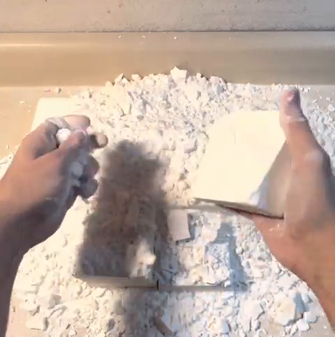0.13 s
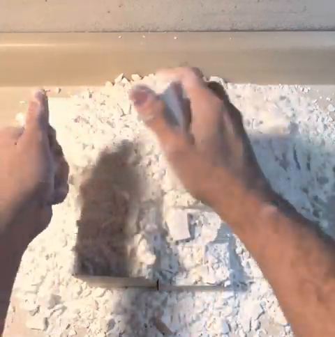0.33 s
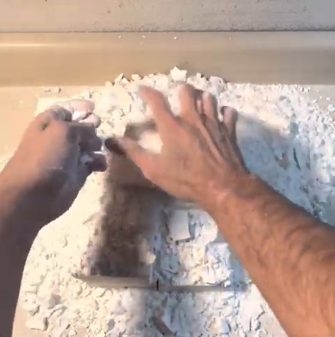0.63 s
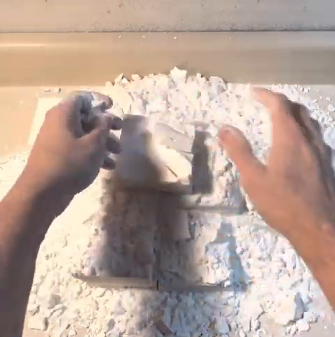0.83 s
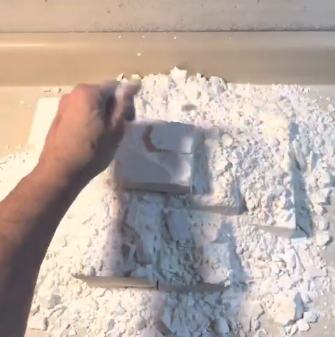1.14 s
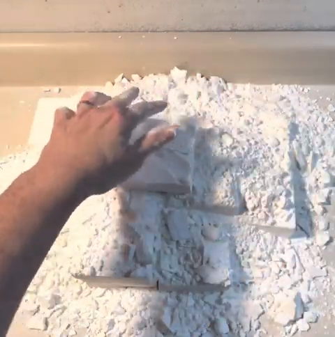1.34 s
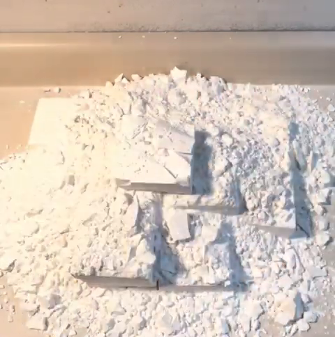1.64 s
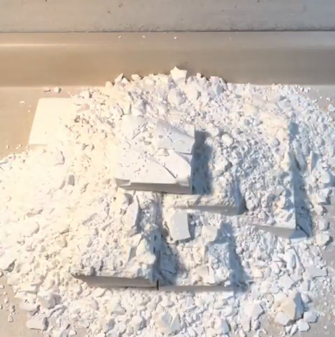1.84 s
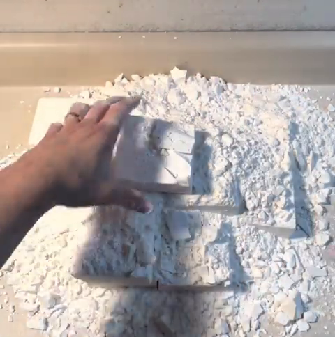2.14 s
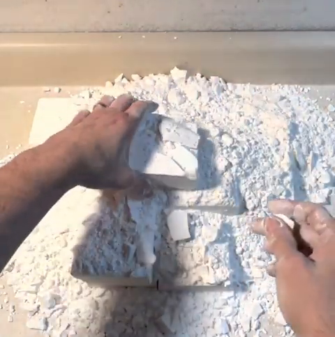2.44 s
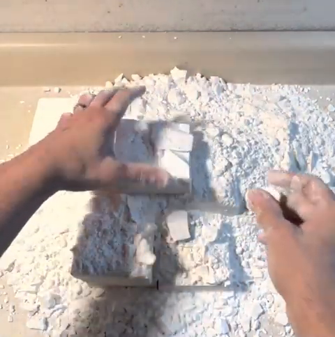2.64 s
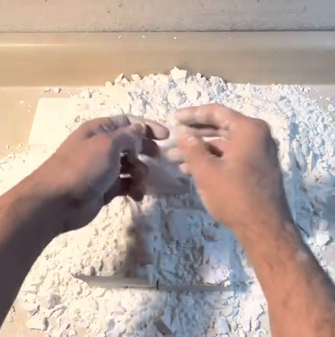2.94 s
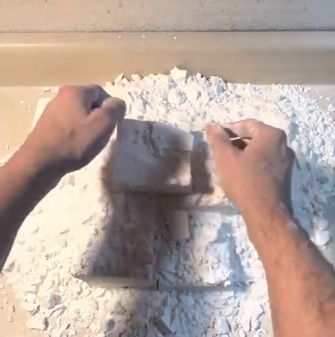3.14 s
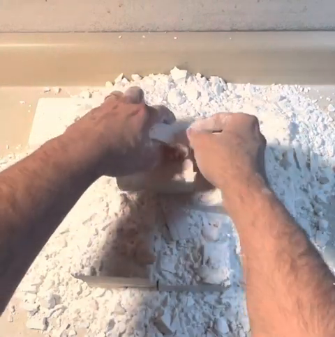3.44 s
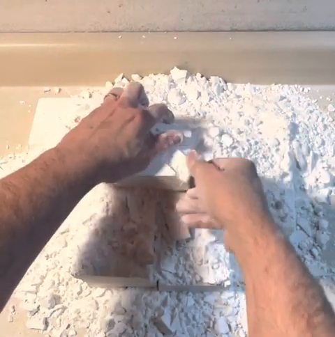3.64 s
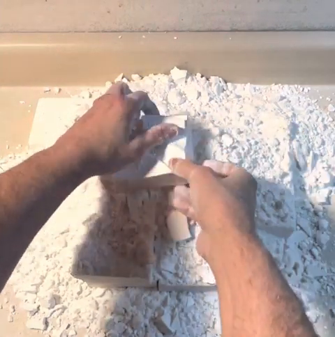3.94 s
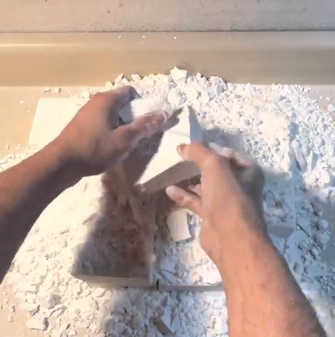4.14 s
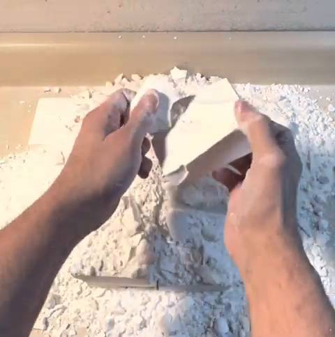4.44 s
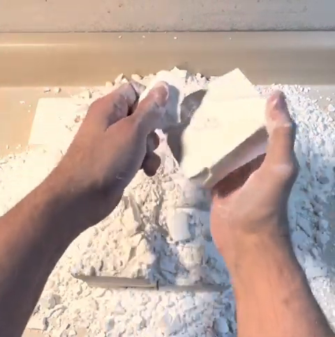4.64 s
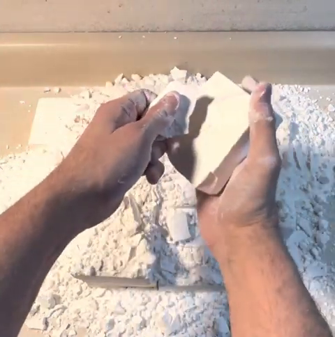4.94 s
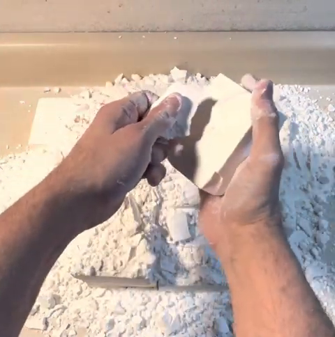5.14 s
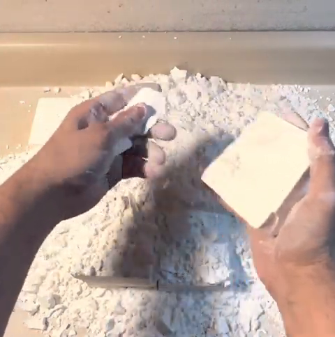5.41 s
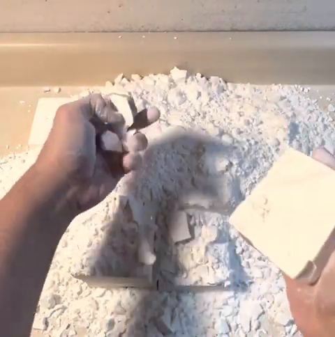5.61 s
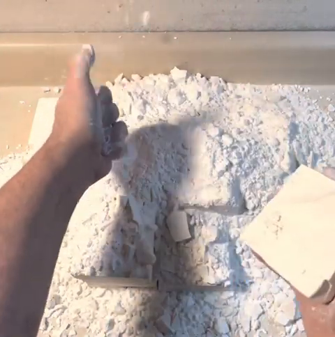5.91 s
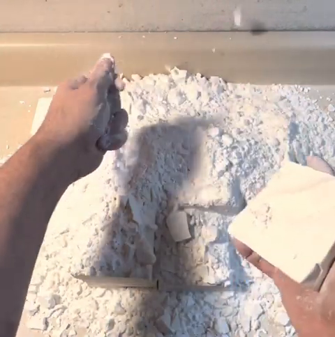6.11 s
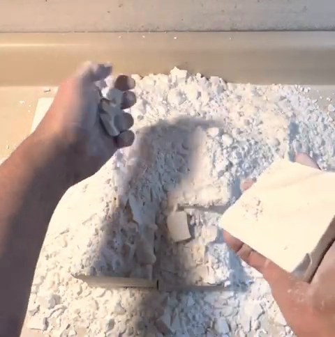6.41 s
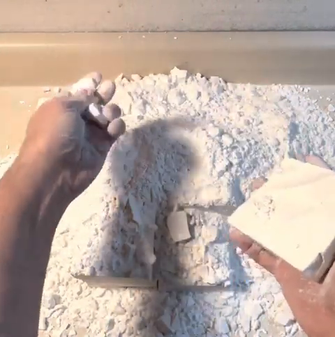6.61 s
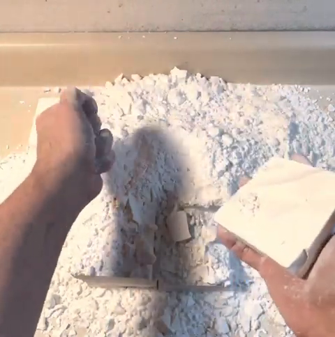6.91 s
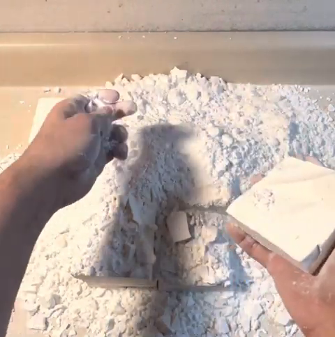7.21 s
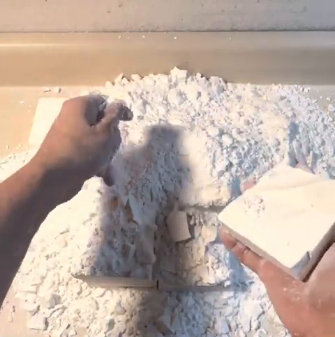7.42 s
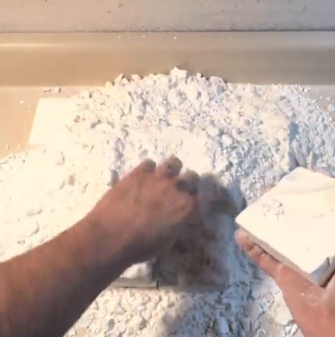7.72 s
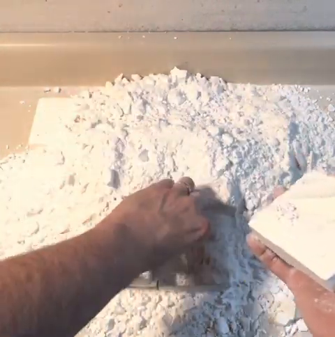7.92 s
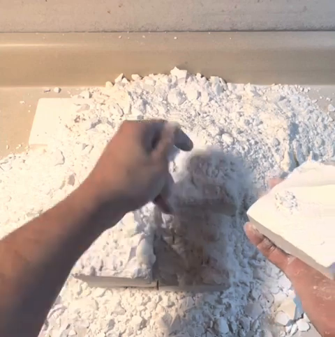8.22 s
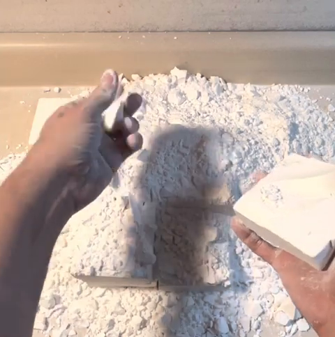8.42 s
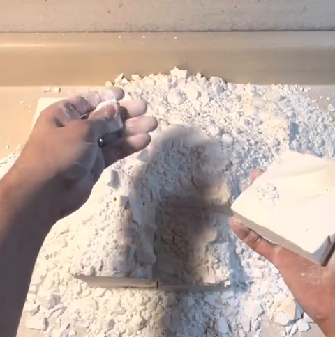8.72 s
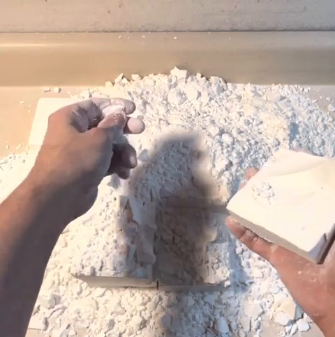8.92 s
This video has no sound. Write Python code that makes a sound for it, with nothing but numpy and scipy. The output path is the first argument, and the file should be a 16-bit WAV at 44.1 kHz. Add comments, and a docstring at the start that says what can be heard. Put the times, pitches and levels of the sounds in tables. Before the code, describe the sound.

In a small room, close stereo microphones hear chalk broken by hand over a constant low machine rumble with a faint motor tone. From 0.2 s, dry ticks and powdery rubbing thicken into crunching; at 0.65 s a heavy boomy thud rings the counter, and brittle cracks crowd in until 1.3 s, ending with a short squeak. Sparse crumbling follows, with a crumbly tap at 1.83 s and an abrupt, brief dip in level. Soft low thumps come at 2.3-2.6 s and 3.4-3.7 s, then gritty rubbing, a small crack at 4.1 s and thin squeaks at 4.5-4.9 s. Sharp snapping starts at 5.25 s and becomes loudest at 5.55-5.9 s, clipping hard. Scattered crackles fade, another strong snap lands at 6.8 s, and light rubbing and soft pushes continue through 8 s. A dull scrape precedes crisp cracks from 8.8 s to the end, about 9 s.

```python
"""Breaking and rubbing chalk

Hands snap, rub and crush soft chalk blocks on a counter, heard by two close microphones.
Cracks are dying noise bursts through short resonances; fingers hiss and crumbs crunch as grainy coloured noise.
Pushes ring the counter's low mode; thuds and a few low taps and ticks are noise blows through low resonances.
A machine hums as low noise and steady tones; the level dips once, briefly, and the loudest peaks clip."""
import sys
import numpy as np
from scipy import signal
from scipy.fft import rfft, irfft, next_fast_len
from scipy.io import wavfile
from scipy.ndimage import uniform_filter1d, map_coordinates

SR = 44100
rng = np.random.default_rng(int(sys.argv[2]) if len(sys.argv) > 2 else 0)


def ratio_of_db(decibels):
    """Turn decibels (scalar or array-like) into linear amplitude factors; 0 dB maps to 1."""
    return 10 ** (np.asarray(decibels, float) / 20)


def to_wav(s):
    """Save 16-bit WAV."""
    ch = np.atleast_2d(s).T  # columns
    pcm = np.round(np.clip(ch, -1, 1) * 32767)  # PCM
    wavfile.write(sys.argv[1], SR, pcm.astype(np.int16))


N = 399546  # samples in the scene

# clear fractures and knocks: start_s, peak_db, ring_hz (strongest ring),
# knock_db (re peak), treble_db (re peak)
FRACTURES = [(0.179, -16, 2720, -21, -8), (0.2105, -22, 2860, -17, -26), (0.2825, -11, 5850, -19, -1),
             (0.2907, -3, 2000, -16, -19), (0.3453, -9.5, 2540, -20, -14), (0.3905, -9, 2060, -12, -12),
             (0.4023, -16, 5000, -21, -22), (0.4403, -4.5, 1950, -34, -11), (0.5015, -15, 1930, -21, -16),
             (0.5236, -8.5, 2010, -27, -41), (0.5641, -21, 1970, -20, -9), (0.633, -10, 2000, -14, -39),
             (0.6512, -3.5, 1450, -19, -29), (0.6546, -2, 3000, 0, -35), (0.6834, -25, 1280, -8, -20),
             (0.7391, 6.5, 5620, -12, -15.5), (0.7973, -5, 5940, -7, -15), (0.8131, -3.5, 1910, -10.5, -9),
             (0.8504, -22, 2990, -9, -6), (0.953, -2.5, 5200, -13, -17), (0.9594, -8, 1980, -22, -1),
             (1.0146, -7, 6300, -10.5, -9), (1.059, -19, 5770, -12, -19), (1.076, -15, 2790, -25, -10),
             (1.09, -24, 3450, -13, -25), (1.1416, -21.5, 1310, -13, -9), (1.2234, -13.5, 5260, -23, -3),
             (1.261, -15, 5440, -25, -9), (1.274, -5, 5510, -23, -7), (1.2981, -15, 1880, -6, -36),
             (1.4865, -5, 2090, -28, -52), (1.6007, -16.5, 7100, -30, -23), (1.9804, -25, 2780, -2, -21),
             (2.2904, -18.5, 2760, 0, -40), (2.5406, -31, 1900, -6, -41.5), (2.5543, -16.5, 3010, 2.5, -50),
             (2.603, -22.5, 3020, 3, -2.5), (3.463, -13, 1830, 1, -23), (3.5355, -27, 1955, 8, -11),
             (3.696, -21.5, 3020, 7, -21), (3.7638, -22, 4100, -3.5, -29), (3.7974, -19, 3070, -22, -40),
             (3.88, -28.5, 4092, -12, 3), (3.9253, -28.5, 1330, 6, -17), (4.1262, -9, 2600, -27, 0),
             (4.1946, -22, 6000, -12, -15), (4.227, -24, 2920, -30, -3), (4.398, -30, 4090, -2, -13),
             (5.2449, -9.5, 6000, -29, -24), (5.2928, -6, 4450, -25, -3.5), (5.3143, 1, 5400, -21, -14),
             (5.3639, 3.5, 2410, -24, -6), (5.5706, 8, 5330, -22, -6), (5.5824, -2.5, 2830, -17, -12),
             (5.6096, -8.5, 7300, -17, -49), (5.6527, 11.5, 2590, -24, -8.5),
             (5.7134, -0.5, 2460, -12.5, -34), (5.7342, -14, 2400, -15, 7.5), (5.7491, 4.5, 2300, -24, -14),
             (5.7554, -7, 2720, -27, -14), (5.7707, -14, 2700, -24, -22), (5.7867, 13.5, 2830, -40, -16),
             (5.817, -2, 2790, -22, -15), (5.8252, -0.5, 2580, -32, -10), (5.8394, -6.5, 2580, -23, -9.5),
             (5.876, 5, 2980, -11, -8.5), (5.9297, -19, 7440, -23, -27), (5.935, -18, 2580, -15, -27),
             (5.9542, -17, 2830, 1, -29), (6.0339, -3.5, 4700, -19, -19), (6.11, -11, 2130, 2.5, -9),
             (6.1353, -15.5, 5990, -12, -19), (6.2028, -8, 1480, -14, -12), (6.2102, -11, 2460, -2, -17),
             (6.2572, -13.5, 2470, -25, -6), (6.348, -26, 2530, -29, -24), (6.4872, -19.5, 2350, -11, -17),
             (6.757, -8.5, 5590, -24, -10), (6.7779, -12, 8500, -20, 8.5), (6.7858, -3, 7000, -25, -7),
             (6.7928, -14.5, 2720, -23.5, -15), (6.8059, -14.5, 2530, -21, -16),
             (6.8273, 6.5, 2350, -22, -5.5), (6.8597, -13, 2560, -20, 1), (6.8795, -13.5, 1700, -1.5, -15),
             (6.9225, -15, 2430, -30, -37), (7.0236, -11.5, 1400, -11, -22),
             (7.0824, -19, 5920, -19.5, -23), (7.224, -37, 2500, -8, -20), (7.2443, -16, 5420, -21, -19),
             (7.2652, -17, 2310, -16, 0), (7.3168, -17, 2800, -32, -27), (7.356, -22, 2750, -26, -16),
             (7.421, -18, 2030, -17, -25), (7.6019, -13.5, 1300, -25, -17), (7.6836, -19, 3966, -5, -24),
             (7.755, -29, 1360, -9, -16), (7.7622, -21.5, 4060, -19, -3), (7.9454, -15, 1960, -22, -26),
             (8.2507, -23.5, 1611, -1.5, -5), (8.7826, 5, 2540, -18, -13), (8.8034, -7, 2430, -25, -22),
             (8.8259, 2, 2460, -17, -15), (8.837, -8, 3390, -18, -10), (8.8684, -17, 2540, -26, -13),
             (8.9029, -9.5, 5000, -29, -11), (8.9339, -1.5, 2420, -36, -5.5),
             (8.955, -12.5, 7800, -26, -24), (8.972, -25, 2850, -16, -12), (8.9917, -15, 4970, -28, -3),
             (9.0544, -4.5, 2920, -25, -12)]
# resonances of a whole chalk block: pitch_hz, width_hz, level_db (per pass through the block)
BLOCK_MODES = [(910, 120, -14), (1900, 190, -1), (2580, 39, 4), (3000, 90, 1), (3780, 43, 4.5),
               (4150, 90, 4.5), (4640, 61, 5), (5450, 190, 5), (5750, 140, 4), (6280, 150, 5.5),
               (7840, 1500, 1.5)]
# colour of the snap: freq_hz, level_db (relative)
SNAP_COLOUR = [(710, -17), (1200, -14.5), (2020, -15), (2590, -3), (3220, -14.5), (4960, -5.5),
               (6960, -4.5), (9500, -7), (12400, -47), (20900, -120)]
# colour of the dull knock: freq_hz, level_db (relative)
KNOCK_COLOUR = [(180, -35), (300, 1), (592, -11), (1030, -8.5), (1410, -17.5), (1600, -12.5), (2080, -15.5),
                (3520, -120)]
# colour of the finest treble, for cracks and rubbing: freq_hz, level_db (relative)
SHEEN_COLOUR = [(5000, -33), (8500, -11), (9270, -12), (10000, -15.5), (13200, -11), (15100, -16),
                (16300, -58)]
BASE_T60_S, T60_SCATTER = 0.017, 0.39  # ring-down of a fracture before stretching, log spread
HEAVY_DB = 31.5  # a heavier knock crumbles longer: ten times the ring-down per this much more knock


def cracks():
    """Each fracture is a dying burst with its own ring, a dull knock and a treble spit; some tap the block."""
    out, taps = np.zeros((2, N + SR)), np.zeros((2, N + SR))
    pulses = causal(SNAP_COLOUR), causal(KNOCK_COLOUR), causal(SHEEN_COLOUR)
    size = SR // 20
    powder_gain = pressure()[0]
    for start_s, peak_db, ring_hz, knock_db, treble_db in [*FRACTURES, *ticks(powder_gain)]:
        stretch = 10 ** (np.clip(knock_db + 12, 0, 14) / HEAVY_DB)
        t60 = BASE_T60_S * stretch * np.exp(T60_SCATTER * rng.standard_normal())
        at = round(start_s * SR)
        crack = fracture(ring_hz, knock_db, treble_db, t60, size, pulses)
        out[:, at:at + size] += ratio_of_db(peak_db) * crack
        if .6 < start_s < 4.3:  # only between these times do cracks also tap the block
            taps[:, at:at + size] += ratio_of_db(peak_db + .4 * knock_db + 3) * burst(.3 * t60, size)
    block = filtered(taps[:, :N], modes(BLOCK_MODES))
    return spread(out[:, :N] + ratio_of_db(-12) * block)


def fracture(ring_hz, knock_db, treble_db, t60, size, pulses):
    """One break: a sharp step and noise ring the loose piece, with a longer knock and a treble spit."""
    snap, knock, sheen = pulses
    split = burst(0.91 * t60, size)
    split[:, 6] += 2.5  # the break itself is one sharp step
    # the loose piece has modes of its own
    shard = [(hz, 0.06 * hz, -5) for hz in ring_hz * np.exp(rng.normal(0, 0.4, size=3))]
    ring = filtered(split, modes([(ring_hz, .3 * ring_hz, 0)] + shard))
    # soft contacts keep little beyond their own ring and roll off steeply above it
    brittle = ratio_of_db(np.clip(0.61 * (treble_db + 6.5), -24, 5))
    edge_hz = ring_hz * (1.5 + 6 * brittle)
    body = brittle * coloured(split, snap) + 3 * ring
    body = filtered(body, lambda f: 1 / (1 + 1j * f / edge_hz) ** 3)
    thump = coloured(burst(1.96 * t60, size), knock)
    spit = coloured(burst(t60, size), sheen)
    crack = peaked(body) + ratio_of_db(knock_db) * peaked(thump) + ratio_of_db(treble_db) * peaked(spit)
    # one source: the second signal is mostly a slightly late copy of either sign
    late = rng.choice([-1, 1]) * np.roll(crack[0], rng.integers(2, 9))
    crack[1] = 0.43 * late + 0.19 * crack[1]
    return crack


def burst(t60, size):
    """Two noises with a fast onset and an exponential decay, t60 held between 2 and 80 ms."""
    t = np.arange(size) / SR
    life = np.clip(t60, .002, .08)
    onset = 1 - np.exp(-t / (0.011 * life))
    return rng.standard_normal((2, size)) * ratio_of_db(-60 * t / life) * onset


def coloured(x, pulse):
    """Noise takes on the colour of an impulse by convolution."""
    return signal.fftconvolve(x, pulse[None])[:, :x.shape[1]]


def peaked(x):
    """Scale so that the first signal peaks at 1."""
    return x / np.abs(x[0]).max()


TICK_COUNT, TICK_HZ = 32, 3230  # small ticks that strokes shake loose, middle pitch
TICK_DB, TICK_SCATTER_DB = 3, 2  # least peak over the powder's level (capped at -32 dB), scatter scale
TICK_KNOCK_DB, TICK_TREBLE_DB = -10, -10  # re peak, middle of the scatter


def ticks(powder_gain):
    """Random small fractures come denser and louder where the fingers press."""
    level_db = 20 * np.log10(powder_gain)
    odds = np.cumsum(level_db - level_db.min())
    when, size, pitch, knock, treble = rng.random((TICK_COUNT, 5)).T
    at = np.searchsorted(odds, when * odds[-1])
    peak_db = np.minimum(level_db[at], -32) + TICK_DB - TICK_SCATTER_DB * np.log(size)
    ring_hz = TICK_HZ * 4 ** (pitch - .5)  # up to an octave either way
    knock_db = TICK_KNOCK_DB + 16 * (knock - .5)
    treble_db = TICK_TREBLE_DB + 16 * (treble - .5)
    return np.transpose([at / SR, peak_db, ring_hz, knock_db, treble_db])


# colour of the powder's hiss: freq_hz, level_db (relative)
POWDER_COLOUR = [(1000, -14), (1700, 0), (2770, 7), (3390, 4.5), (3790, 4), (7670, 1.5), (9000, -7.5),
                 (11700, -60), (19800, -120)]
# colour of the crunching crumbs: freq_hz, level_db (relative)
CRUMB_COLOUR = [(260, -1), (450, -8), (692, -1.5), (917, -2.5), (2000, -21.5), (2600, -16), (4400, -120)]
# part of the powder's power that rings in a whole block: time_s, share (0-1)
HELD_SHARE = [(0, 0.12), (1.1, 0.18), (1.3, 0.4), (1.5, 0), (2.5, 0.04), (3.3, 0.37), (4.1, 0.45),
              (4.35, 0.3), (4.65, 0.8), (4.92, 1), (5, 0.08), (9.06, 0.04)]


def rubbing():
    """Powder, treble and crumbs hiss with grain of their own and one shared flutter, under the squeaks."""
    powder_gain, sheen_gain, crumb_gain = pressure()
    held = np.clip(curves(HELD_SHARE)[0], 0, 1)
    loose = patchy(spread(gritty(2, 400), POWDER_COLOUR), patchy_db=3)
    powder = np.sqrt(1 - held) * loose + np.sqrt(held) * block_ring()
    sheen = patchy(spread(gritty(1.9, 500), SHEEN_COLOUR), patchy_db=6)
    crumb = patchy(spread(gritty(0.71, 150), CRUMB_COLOUR), patchy_db=4.0)
    flutter = ratio_of_db(2.56 * wobble(40))
    hiss = flutter * (powder_gain * powder + sheen_gain * sheen + crumb_gain * crumb)
    return hiss + squeaks_and_scrape()


def block_ring():
    """Grit stirs a whole block; as the contact point wanders, each mode waxes and wanes on its own."""
    stroke = gritty(1.6, 270)
    # squaring the response passes the stroke through each mode twice
    rings = filtered(stroke, lambda f: np.array([[modes([mode])(f) ** 2] for mode in BLOCK_MODES[1:]]))
    ring = sum(ratio_of_db(4 * wobble(9)) * one for one in rings)
    return unit(spread(ring))


# squeaks of chalk, and one broad dull scrape near the end: start_s, end_s, pitch_hz,
# width_hz (per filter pass), level_db (rms before the swell)
SQUEAKS_AND_SCRAPE = [(0.303, 0.622, 1990, 505, -37), (1.21, 1.332, 5450, 400, -33),
                      (1.265, 1.335, 1900, 89, -30.5), (1.26, 1.346, 3000, 109.8, -42),
                      (1.28, 1.332, 2580, 110, -39), (3.374, 4.1, 5450, 219.8, -50),
                      (4.093, 4.15, 6330, 298.6, -29), (4.11, 4.148, 4330, 200, -30.5),
                      (4.205, 4.301, 2800, 401, -39), (4.211, 4.307, 6460, 400, -36.5),
                      (4.494, 4.573, 4640, 150, -41), (4.615, 4.72, 4640, 150, -39.5),
                      (4.68, 4.83, 6280, 130, -31.5), (4.658, 4.933, 3000, 100, -40.5),
                      (4.756, 4.885, 2580, 130, -50), (4.667, 4.97, 3780, 110, -41.5),
                      (4.677, 4.9, 5560, 120, -40), (4.8, 4.883, 5750, 180, -36),
                      (5.698, 5.82, 2500, 300, -29), (8.374, 8.482, 8370, 300, -45),
                      (8.377, 8.468, 11800, 302, -44.5), (8.588, 8.737, 5200, 1800, -36)]


def squeaks_and_scrape():
    """Slow, rough grit passed twice through one band swells and fades: narrow squeaks, one broad scrape."""
    out = np.zeros((2, N))
    drive = gritty(3, 35)
    for start_s, end_s, hz, width_hz, level_db in SQUEAKS_AND_SCRAPE:
        a, b = round(start_s * SR), round(end_s * SR)
        band = filtered(drive[:, a:b], lambda f: modes([(hz, width_hz, 0)])(f) ** 2)
        out[:, a:b] += ratio_of_db(level_db) * swell(size=b - a) * unit(spread(band))
    return out


def swell(size):
    """A smooth rise and fall over size samples."""
    return np.abs(np.sin(np.linspace(0, np.pi, size))) ** .8


# strokes and squeezes of the fingers on chalk: peak_s, rise_s, fall_s (each spans 20 dB),
# powder_db, treble_db, crumb_db
FINGER_STROKES = [(0, .1, .15, -40.5, -48, -37.5), (0.189, .12, .25, -32.5, -36.5, -41.5),
                  (0.29, .05, 0.069, -32, -35, -30.5), (.395, .12, 0.085, -34, -40.5, -34),
                  (0.451, 0.03, 0.43, -36.5, -42.5, -43), (.655, .04, 0.082, -21, -34.5, -21),
                  (0.746, .015, 0.041, -20, -42, -17.5), (0.81, .05, .15, -28, -38, -27),
                  (.962, .03, 0.12, -31.5, -38, -25), (.89, 0.086, .12, -39, -54, -38),
                  (1.06, .2, .25, -35.5, -44.5, -34), (1.214, 0.091, 0.092, -35, -35, -42),
                  (1.285, .05, .07, -29, -37, -28.5), (1.399, .2, .2, -45.5, -74, -33.5),
                  (1.495, .03, .14, -40.5, -46, -30.5), (1.607, .05, .15, -43, -53, -41),
                  (1.76, 0.33, 0.23, -42, -53, -32.5), (1.845, .04, 0.033, -41, -39.5, -19.5),
                  (1.999, .3, .35, -40.5, -50.5, -35), (2.3, 0.016, .16, -37.5, -44, -27.5),
                  (2.45, 0.33, .3, -48.5, -54, -42.5), (2.601, 0.13, 0.18, -45, -52, -44),
                  (2.741, 0.18, 0.24, -44.5, -72, -49), (2.83, 0.14, 0.17, -44, -50, -41),
                  (2.925, .15, .11, -39, -32, -47), (3.39, .2, .1, -44, -47, -63),
                  (3.467, 0.057, .1, -42.5, -47, -33), (3.59, .1, 0.11, -39.5, -39, -40),
                  (3.706, 0.17, .14, -37, -39, -34), (3.891, .15, 0.13, -39, -45, -44),
                  (3.969, 0.087, .3, -33, -36.5, -32.5), (4.123, 0.13, .05, -32.5, -28, -41),
                  (4.25, 0.11, 0.13, -40, -42, -49), (4.39, .03, 0.16, -45.5, -46, -59),
                  (4.525, .1, .07, -38.5, -41, -43), (4.72, .14, 0.27, -36.5, -36.5, -67),
                  (4.879, 0.22, .12, -37.5, -39, -67), (5.255, 0.045, .2, -28, -28, -55),
                  (5.3, 0.09, 0.093, -26.5, -28, -37), (5.374, 0.034, 0.18, -27.5, -37, -35),
                  (5.577, .06, .07, -25, -24.5, -33.5), (5.66, .02, .1, -19, -37, -36),
                  (5.76, .15, 0.17, -27, -42, -32.5), (5.851, 0.14, 0.11, -21.5, -46, -34),
                  (5.95, 0.13, .35, -32, -42, -33), (6.118, 0.076, 0.099, -28.5, -31, -28),
                  (6.21, .03, .25, -36, -57, -35.5), (6.38, .3, .2, -44, -48, -59),
                  (6.58, 0.057, .4, -41.5, -39, -43), (6.701, 0.22, .2, -41.5, -45, -47),
                  (6.828, .1, .12, -22.5, -30, -27.5), (6.97, .15, .2, -34.5, -52, -38),
                  (7.08, 0.15, .06, -37.5, -44, -36), (7.27, .11, .16, -29.5, -33, -39),
                  (7.44, .08, .09, -32.5, -36, -40.5), (7.602, 0.054, .2, -46, -55, -38),
                  (7.75, 0.22, 0.18, -44, -51, -39.5), (7.948, .05, .05, -36.5, -35, -29.5),
                  (7.995, .03, .05, -45, -43, -41), (8.255, 0.068, .12, -38.5, -40, -38),
                  (8.42, .15, .15, -52, -52, -57), (8.7, 0.16, .03, -38.5, -39, -44),
                  (8.79, .012, .15, -25, -34.5, -30), (8.945, .08, 0.14, -32, -43, -37),
                  (9.058, .03, 0.048, -21.5, -31, -40)]
# the heap settling between strokes: powder_db, treble_db, crumb_db
SETTLING = (-55, -71.5, -50)
STROKE_ROUND = 1.1  # 1 = pointed peak, 2 = bell


def pressure():
    """Gains of powder, treble and crumbs: each stroke swells to its peak and dies away, adding in power."""
    t = np.arange(0, N + 32, 32) / SR
    peak_s, rise_s, fall_s, *levels_db = np.transpose(FINGER_STROKES)
    before = (peak_s[:, None] - t) / rise_s[:, None]
    after = (t - peak_s[:, None]) / fall_s[:, None]
    away = np.maximum(before, after)
    shape = ratio_of_db(-20 * away ** STROKE_ROUND)
    power = ratio_of_db(np.array(levels_db)) ** 2 @ shape ** 2 + ratio_of_db(np.array(SETTLING))[:, None] ** 2
    return [np.interp(np.arange(N) / SR, t, np.sqrt(p)) for p in power]


# dull thuds on the counter, with a few short low taps and ticks of chalk:
# start_s, peak_db, length_s, ring_hz (upper ring)
LOW_BLOWS = [(0.657, -1.5, 0.022, 467), (0.79, -38, 0.0089, 600), (0.959, -14.5, 0.015, 510),
             (1.275, -15, 0.0085, 990), (1.294, -22.5, 0.0089, 980), (1.711, -19, 0.01, 804),
             (1.83, -8, 0.022, 585), (1.848, -6, 0.004, 804), (2.285, -12.5, 0.062, 402),
             (2.554, -23, 0.016, 853), (2.607, -26, 0.0099, 920), (3.438, -31, 0.0062, 1100),
             (3.45, -16.5, 0.027, 480), (3.529, -16, 0.023, 511), (3.699, -14.5, 0.012, 552),
             (4.031, -19.5, 0.079, 446), (5.862, -29, 0.012, 890), (5.876, -6, 0.0041, 1024),
             (6.115, -17.5, 0.018, 610), (6.2, -19.5, 0.014, 600), (6.696, -14.5, 0.0052, 610),
             (7.572, -26, .006, 1120), (8.789, -16, 0.009, 610)]


def counter():
    """The counter's lowest mode rings under pushes; noise blows through low resonances thud, tap and tick."""
    out, t = np.zeros(N + SR), np.arange(SR // 5) / SR
    hz, gain = pushes()
    phase = 2 * np.pi * np.cumsum(hz + 5 * wobble(30)) / SR
    mode = np.sqrt(2) * ratio_of_db(1.03 * wobble(24.57)) * np.sin(phase)
    # uneven pressure stirs the neighbouring modes
    neighbours = modes([(64, 22, 0), (130, 40, -2)])
    sway = unit(filtered(rng.standard_normal(N), lambda f: neighbours(f) ** 2))
    out[:N] += gain * (mode + ratio_of_db(-8.0) * sway)
    for start_s, peak_db, length_s, ring_hz in LOW_BLOWS:
        blow = rng.standard_normal(len(t)) * (t / length_s) * np.exp(-2.5 * t / length_s)
        rings = [(60, 40, -3), (230, 120, -3), (390, 150, -3), (ring_hz, 0.22 * ring_hz, -6)]
        blow = filtered(blow, modes(rings))
        out[round(start_s * SR):][:len(t)] += ratio_of_db(peak_db) * blow / np.abs(blow).max()
    return out[:N]


# pushes that flex the counter: start_s, pitch_hz, level_db, t60_s
COUNTER_PUSHES = [(.664, 97.6, -0.5, 0.33), (.69, 97.52, -4.5, 0.52), (.745, 95.4, -13.5, 0.6),
                  (.96, 118.4, -32.5, 0.87), (1.293, 103.8, -11.5, 0.21), (1.385, 91.03, -19, 0.14),
                  (2.31, 89, -20, 0.32), (2.425, 97.96, -15, 0.31), (2.572, 101.2, -6.5, 0.27),
                  (2.64, 97.8, -7.5, .25), (2.725, 94, -17, 0.32), (3.408, 91.6, -12, 0.13),
                  (3.449, 94.64, -8, 0.32), (3.485, 93.1, -12, .08), (3.545, 92.8, -15, 0.21),
                  (3.66, 97.9, -13, 0.16), (3.708, 94.5, -17, 0.99), (3.97, 91.8, -17, 0.61),
                  (4.06, 96.04, -16, 0.33), (7.759, 89.8, -18, 0.14), (7.85, 90.8, -15.5, 0.11),
                  (7.92, 90.7, -19.5, 0.48)]
PUSH_ATTACK_S = 0.004


def pushes():
    """Pitch and gain of the counter's flexing; the strongest push weighs most in the pitch."""
    t = np.arange(N) / SR
    coarse = t[::64]
    start_s, hz, level_db, t60 = np.transpose(COUNTER_PUSHES)[:, :, None]
    since = np.clip(coarse - start_s, 0, None)
    attack = (1 - np.exp(-since / PUSH_ATTACK_S)) ** 2
    power = (ratio_of_db(level_db - 60 * since / t60) * attack) ** 2 + 1e-12
    total = power.sum(0)
    pitch = (hz * power).sum(0) / total
    return [np.interp(t, coarse, v) for v in (pitch, np.sqrt(total))]


# decay of the room: freq_hz, t60_s
ROOM_DECAY = [(300, 0.04), (2000, 0.14), (10000, 0.18)]


def room(x):
    """A small room's noise tail; each frequency dies at its own speed."""
    hz, t, z = signal.stft(rng.standard_normal((2, SR // 4)), SR, nperseg=256)
    decay = ratio_of_db(-60 * t / along(ROOM_DECAY, hz)[:, None])
    tail = signal.istft(z * decay, SR, nperseg=256)[1]
    late = np.pad(x, ((0, 0), (150, 0)))  # the tail starts 150 samples late
    return signal.fftconvolve(late, tail / np.linalg.norm(tail[0]), axes=1)[:, :N]


# colour of the machine's rumble: freq_hz, level_db (relative)
RUMBLE_COLOUR = [(12, -34), (20, -30), (54, -5), (97, -5), (168, 1.5), (195, -10), (266, -16), (304, -13),
                 (328, -17), (358, -11.5), (410, -20), (490, -27.5), (568, -60), (612, -30), (700, -50),
                 (910, -71), (1540, -120)]
# motor tone and odd overtones: pitch_hz, level_db (rms, before the overtones' lift)
MOTOR_TONES = [(357.3, -46), (1072, -68), (1787, -64)]
# lift of the motor's overtones over time: time_s, lift_db
OVERTONE_LIFT = [(0, -8), (4.1, -4), (4.25, 1.5), (5.2, 1), (9.06, -3)]
RUMBLE_DB = -28  # rms


def hum():
    """A machine's rumble is coloured noise, with steady motor tones whose overtones change in strength."""
    t = np.arange(N) / SR
    lift_db = curves(OVERTONE_LIFT)[0]
    tone = np.zeros(N)
    for k, (hz, level_db) in enumerate(MOTOR_TONES):
        tone_db = level_db + (k > 0) * lift_db + 1.5 * wobble(3)
        tone += np.sqrt(2) * ratio_of_db(tone_db) * np.sin(2 * np.pi * hz * t)
    rumble = unit(spread(rng.standard_normal((2, N)), RUMBLE_COLOUR))
    return ratio_of_db(RUMBLE_DB + 0.12 * wobble(2.9)) * rumble + tone


# likeness of the two microphones: freq_hz, correlation (-1 to 1)
MIC_LIKENESS = [(60, 0.81), (110, 0.97), (200, 0.96), (380, 0.34), (700, -0.76), (1290, 0.55), (2380, 0.66),
                (4400, 0.16), (8120, 0.022), (15000, 0.33)]


def spread(pair, spectrum=((1, 0),)):
    """Two signals become mid and side, weighted to the microphones' likeness and coloured."""
    def weights(hz):
        turn = np.arccos(np.clip(along(MIC_LIKENESS, hz), -1, 1)) / 2
        return ratio_of_db(along(spectrum, hz)) * [np.cos(turn), np.sin(turn)]
    mid, side = filtered(pair, weights)
    return np.array([mid + side, mid - side])


def gritty(grit_db, rate):
    """Noise whose loudness jumps grain by grain, rate grains a second."""
    return ratio_of_db(grit_db * wobble(rate)) * rng.standard_normal((2, N))


def patchy(x, patchy_db):
    """Random patches of gain in time and frequency, rms 1."""
    z = signal.stft(x, nperseg=512)[2]
    field = uniform_filter1d(rng.standard_normal(z.shape[1:]), size=3, axis=0)
    field = uniform_filter1d(field, size=8, axis=1)
    return unit(signal.istft(z * ratio_of_db(patchy_db * unit(field)), nperseg=512)[1][:, :N])


def modes(table):
    """Causal response of resonances (pitch Hz, width Hz, level dB) in alternating sign."""
    def response(f):
        total = 0
        for k, (hz, width, db) in enumerate(table):
            total = total + (-1) ** k * ratio_of_db(db) * 1j * f * width / (hz * hz - f * f + 1j * f * width)
        return total
    return response


def causal(spectrum, size=2048):
    """Minimum-phase impulse of energy 1 with this colour, by folding the cepstrum."""
    level_db = np.maximum(along(spectrum, np.fft.rfftfreq(size, 1 / SR)), -70)
    cepstrum = irfft(np.log(ratio_of_db(level_db)), size)
    cepstrum[1:size // 2] *= 2
    cepstrum[size // 2 + 1:] = 0
    pulse = irfft(np.exp(rfft(cepstrum)), size)[:size // 2]
    return pulse / np.linalg.norm(pulse)


def filtered(x, response):
    """Filter x by a complex response of frequency."""
    m = next_fast_len(x.shape[-1] + 4096)
    return irfft(rfft(x, m) * response(np.fft.rfftfreq(m, 1 / SR)), m)[..., :x.shape[-1]]


def wobble(rate):
    """A smooth random curve, rate knots a second."""
    knots = rng.standard_normal(int(N * rate / SR) + 4)
    return map_coordinates(knots, [np.arange(N) * rate / SR])


def curves(rows):
    """One value per sample for each column after the time."""
    s, *columns = np.transpose(rows)
    return [np.interp(np.arange(N) / SR, s, c) for c in columns]


def along(points, hz):
    """(Hz, value) points read on a log axis."""
    f, v = np.transpose(points)
    return np.interp(np.log(hz + 1), np.log(f + 1), v)


def unit(x):
    """Scale to rms 1."""
    return x / np.sqrt(np.mean(x ** 2) + 1e-20)


# the level drops briefly and swells back: start_s, depth_db, recovery_s (time constant of the dB)
LEVEL_DIP = (1.853, -30, .06)


def dip():
    """Gain that falls within 2 ms and swells back exponentially in dB."""
    start_s, depth_db, recovery_s = LEVEL_DIP
    since = np.arange(N) / SR - start_s
    return ratio_of_db(depth_db * np.exp(-np.abs(since) / recovery_s) * np.clip(since / .002, 0, 1))


def scene():
    """Cracks with their room tail, rubbing, counter and hum, all under the brief dip."""
    chalk = cracks()
    tail = ratio_of_db(-11) * room(chalk)
    return dip() * (chalk + tail + rubbing() + counter() + hum())


def band_limit(x):
    """A steep low-pass at the top of the band."""
    return signal.sosfilt(signal.butter(12, 16610, fs=SR, output="sos"), x)


def record(dry):
    """Peaks clip at full scale with a slightly rounded knee."""
    clipped = dry / (1 + np.abs(dry) ** 12) ** (1 / 12)
    return band_limit(clipped)


dry = scene()
out = record(dry)
to_wav(out)
```